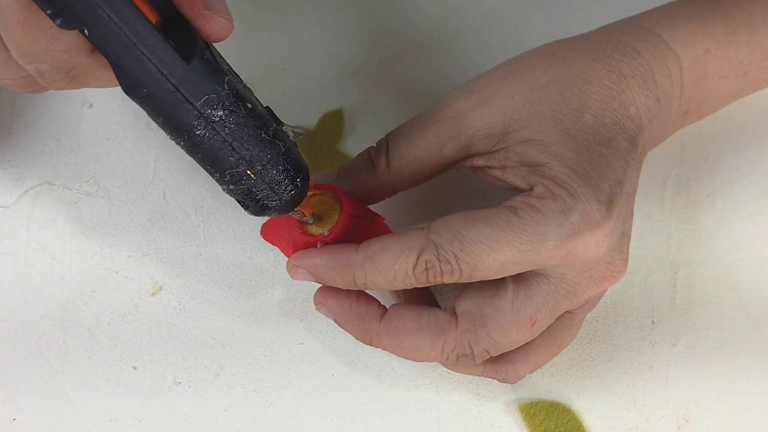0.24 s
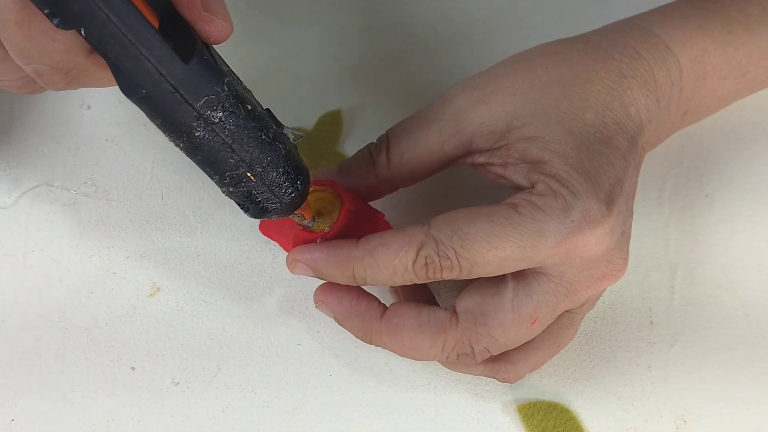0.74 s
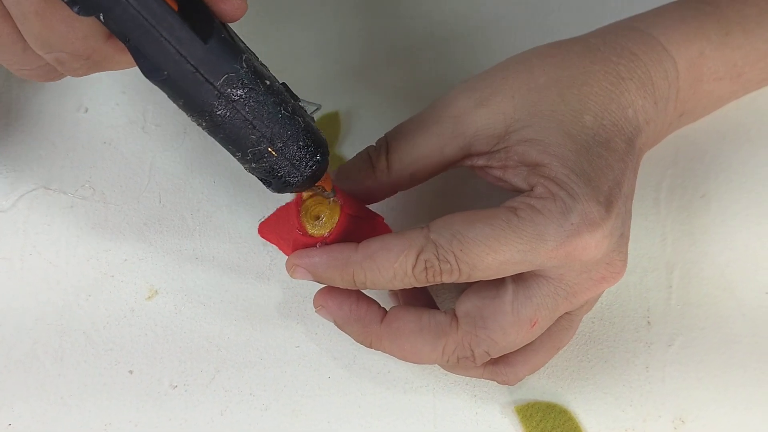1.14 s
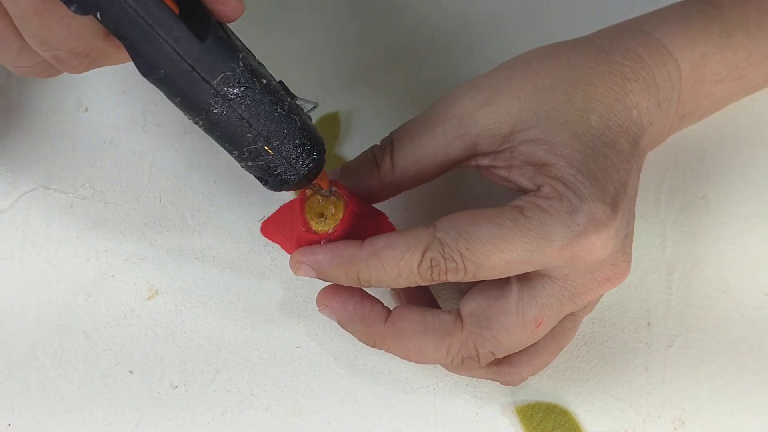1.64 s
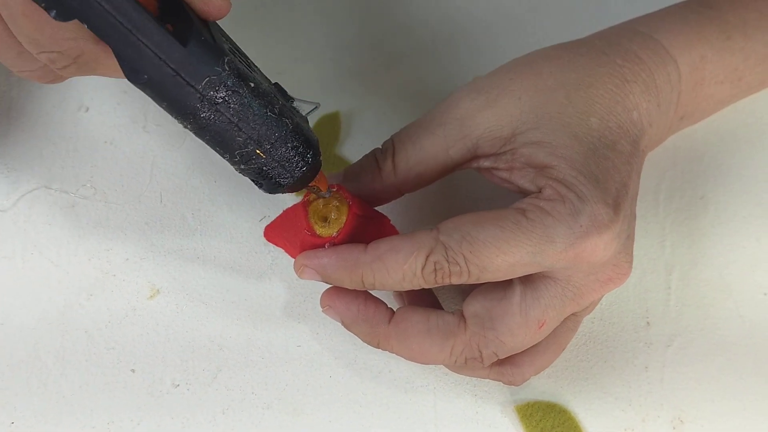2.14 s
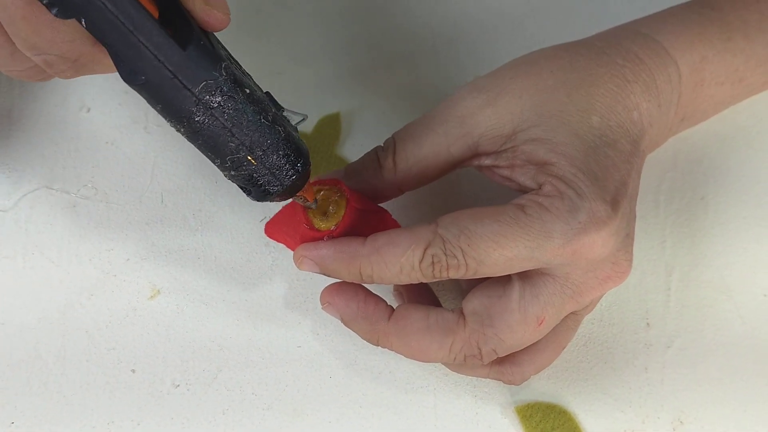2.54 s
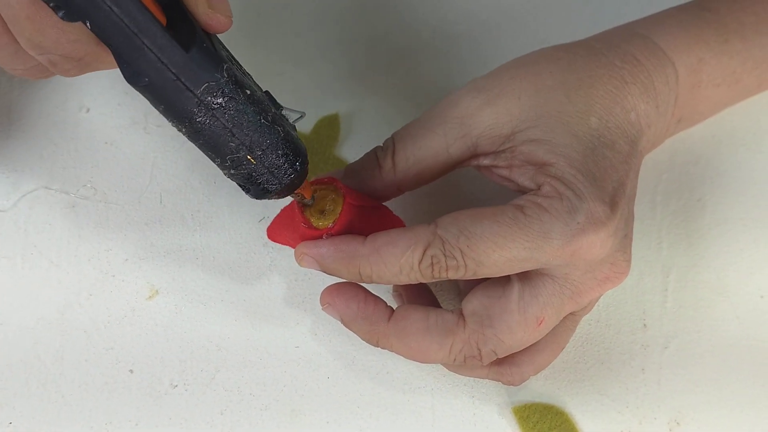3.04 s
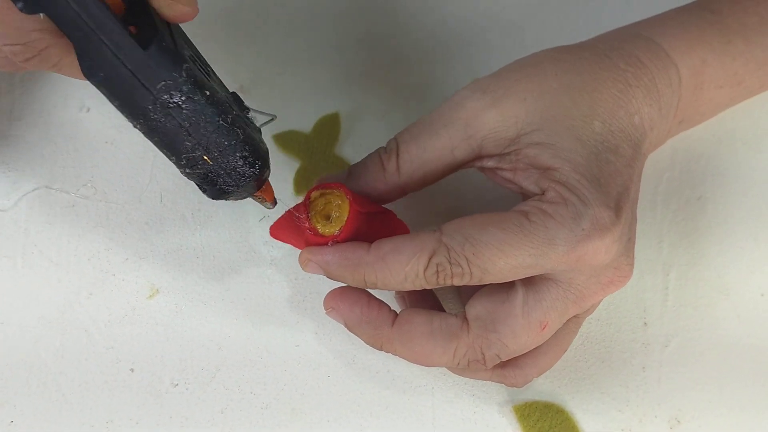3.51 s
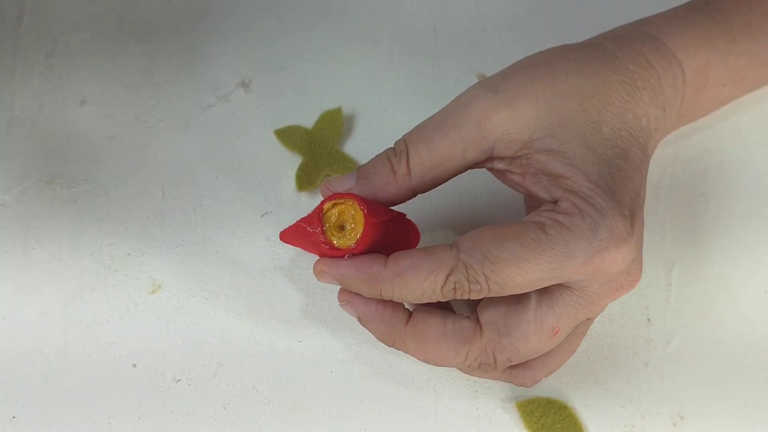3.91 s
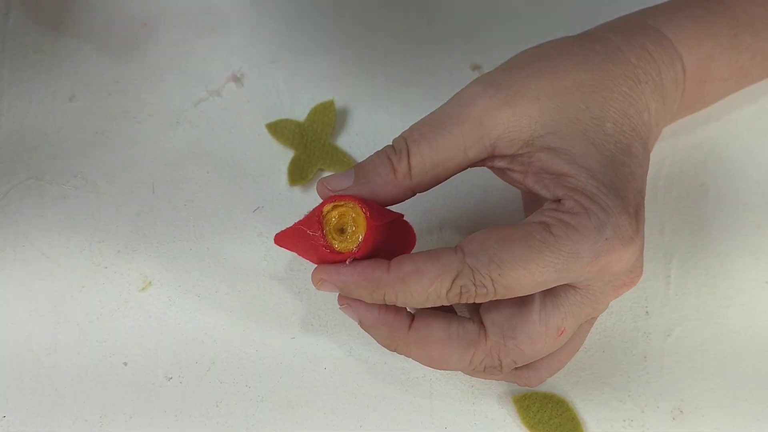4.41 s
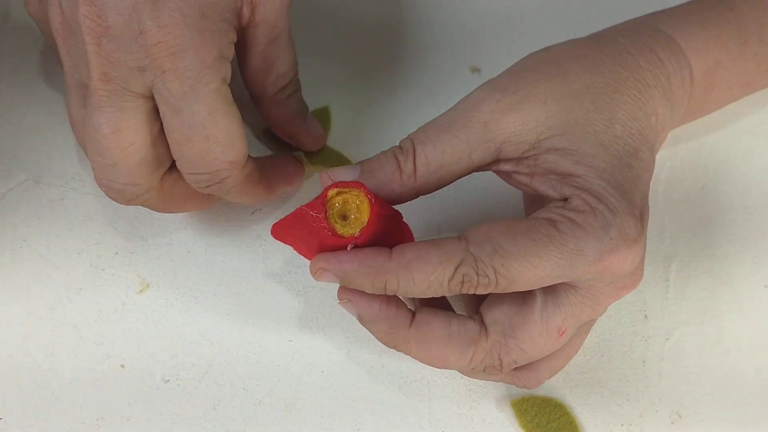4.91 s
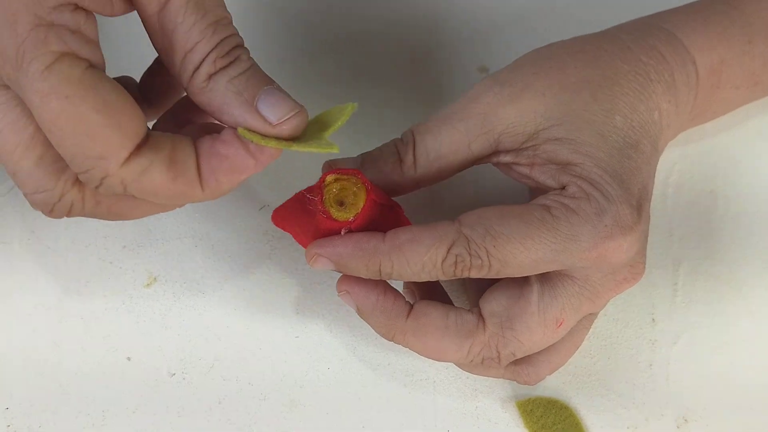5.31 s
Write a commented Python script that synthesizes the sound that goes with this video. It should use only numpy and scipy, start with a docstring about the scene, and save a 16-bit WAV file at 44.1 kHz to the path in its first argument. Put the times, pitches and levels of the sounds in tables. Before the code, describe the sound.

A fan hums softly throughout in a small room, with a faint, thin, pulsing whine high above it. The sound is close and in wide stereo. After a tiny tick near 0.8 seconds, a hot-glue gun's trigger gives a dry snap at about 1.3 seconds. Small ticks from the glue feed follow until around 2.5 seconds, with a short rustle of felt near 2 seconds. A very faint, high squeak of glue wavers from 2.5 to 3 seconds. From about 3.7 seconds come light handling ticks and rubbing. The gun is set down on a table with two bumps at about 4.1 and 4.2 seconds and a short scrape. At 4.6 seconds it drops with a loud, sharp knock that briefly rings the table top and rattles its plastic shell. Then only faint felt rustling and the fan remain, until about 5.5 seconds.

```python
"""A hot-glue gun drops onto a table with a loud knock that rings the table top, close by in a small room.
Before that, its trigger snaps, its feed ticks, and glue squeaks faintly onto rustling felt; then the
gun is set down with two bumps and a scrape, and its plastic shell rattles.
A fan hums behind it all; the camera adds a thin pulsing whine and widens the stereo sound."""
import sys
import numpy as np
from scipy import signal
from scipy.fft import rfft, irfft, next_fast_len
from scipy.io import wavfile
from scipy.ndimage import uniform_filter1d

SR = 44100
rng = np.random.default_rng(int(sys.argv[2]) if len(sys.argv) > 2 else 0)


def waveform_to_disk(signal):
    """Save audio, clipped to [-1, 1], as 16-bit WAV at the path in sys.argv[1]."""
    frames = np.transpose(np.atleast_2d(signal))
    scaled = np.clip(frames, -1, 1) * 32767
    samples = np.round(scaled).astype(np.int16)
    wavfile.write(sys.argv[1], SR, samples)


N = 244755
TIME = np.arange(N) / SR
TOP_HZ = 15900  # treble limit

# blows on the table, from the trigger's jolt to the drop: t/s, push/dB, contact time/ms, shell rattle/dB
KNOCKS = [(1.3498, -28, 0.39, -70), (4.0618, -8, 0.39, -30.5), (4.1882, -35, 0.27, -29.5),
          (4.1941, -0.5, 0.9, -57), (4.2187, -12, 1, -58), (4.5186, -14, 0.52, -63),
          (4.561, 0.3, 0.23, -24.5)]


def amp(db):
    """Turn decibels into a factor to multiply by."""
    return 10 ** (np.asarray(db) / 20)


def unit(x):
    """Scale a signal to an average strength (rms) of 1."""
    return x / np.sqrt(np.mean(x ** 2))


def curve(rows):
    """Join (t/s, value) points with straight lines."""
    return np.interp(TIME, *np.transpose(rows))


def over_pitch(points, f):
    """Read between (f/Hz, value) points, with octaves evenly spaced."""
    hz, value = np.transpose(points)
    return np.interp(np.log(f + 1), np.log(hz), value)


def noise(spectrum, size=N):
    """Stereo noise of strength 1, shaped by (f/Hz, level/dB) points."""
    # how alike the two microphones hear it: f/Hz, correlation (1 = the same)
    likeness = [(60, 0.13), (110, 0), (220, 0.73), (400, 0.52), (750, 0.37), (1400, 0), (15000, 0)]
    count = next_fast_len(size)
    f = np.fft.rfftfreq(count, 1 / SR)
    alike = np.clip(over_pitch(likeness, f), -1, 1)
    mid, side = rfft(rng.standard_normal((2, count))) * np.sqrt([1 + alike, 1 - alike])
    gain = amp(over_pitch(spectrum, f)) * (f < TOP_HZ)
    left_right = np.array([mid + side, mid - side])
    return unit(irfft(left_right * gain, count)[:, :size])


def wobble(per_s):
    """A random wobble of strength 1 that glides to per_s new values a second."""
    size = max(int(SR / per_s), 1)
    steps = np.repeat(rng.standard_normal(N // size + 1), size)
    return unit(uniform_filter1d(steps, size)[:N])


def band(hz, width):
    """A narrow band of noise, heard as a breathy whistle."""
    phase = 2 * np.pi * hz * TIME
    return unit(wobble(width) * np.cos(phase) + wobble(width) * np.sin(phase))


def burst(spectrum, t60, size=8192):
    """A crack of noise; t60 is the time in seconds it takes to fade by 60 dB."""
    fade = amp(-60 * TIME[:size] / t60)
    return unit(noise(spectrum, size) * fade) * np.sqrt(np.mean(fade ** 2))


def strokes(rows):
    """Loudness of strokes that swell by 20 dB in their rise time and fade by 20 dB in their fall time."""
    power = 0
    for s, db, rise, fall in rows:
        away = np.maximum((s - TIME) / rise, (TIME - s) / fall)
        power += amp(db - 20 * np.minimum(away, 10)) ** 2
    return np.sqrt(power)


def add(track, s, sound):
    """Mix a short sound into a track at s seconds."""
    start = int(s * SR)
    track[:, start:start + sound.shape[-1]] += sound[:, :N - start]


def room(x, wet_db, t60, treble_t60):
    """Add the room's short echo at level wet_db; its treble dies first."""
    t = TIME[:SR // 2]
    echoes = rng.standard_normal((2, len(t))) * (1 - np.exp(-t / 0.0027))
    low = signal.sosfilt(signal.butter(1, 3000, fs=SR, output="sos"), echoes)
    tail = low * amp(-60 * t / t60) + (echoes - low) * amp(-60 * t / treble_t60)
    tail /= np.sqrt(np.sum(tail ** 2) / 2)
    return x + amp(wet_db) * signal.fftconvolve(x, tail, axes=1)[:, :N]


def fan(air_db=-54, waver_db=2, drift=.0015):
    """A fan moves air, with a few wavering motor tones and narrow whistles."""
    # rush of the air: f/Hz, level/dB
    air_spectrum = [(30, -1), (60, -3.5), (110, 0.5), (230, 2), (450, -5), (850, -8.5), (1200, -12.5),
                    (1800, -15.5), (3000, -17.5), (5500, -20.5), (8000, -24.5), (10000, -29.5),
                    (13000, -22.5), (15500, -28.5)]
    # motor tones: f/Hz, level/dB
    motor_tones = [(247.6, -61), (296.1, -90), (349.9, -65.5), (527.6, -77.5), (694.4, -77), (742.9, -70),
                   (866.7, -65.5), (1238, -80.5)]
    # whistles in the hiss: f/Hz, width/Hz, level/dB
    bands = [(1760, 170, -77.5), (4200, 190, -78), (5530, 200, -82), (6990, 240, -74.5)]
    air = noise(air_spectrum) * amp(air_db + 0.52 * wobble(6.23))
    hum = 0
    for hz, db in motor_tones:
        peak = amp(db + waver_db * wobble(5)) * np.sqrt(2)
        phase = 2 * np.pi * hz * np.cumsum(1 + drift * wobble(8)) / SR
        hum += peak * np.sin(phase)
    whistles = sum(amp(db) * np.array([band(hz, width), band(hz, width)]) for hz, width, db in bands)
    return air + hum + whistles


def camera_whine(whine_db=-74, pulse_db=7, pictures_per_s=30):
    """The camera's electronics give a high hiss that blips with every picture."""
    blip = (.5 + .5 * np.cos(2 * np.pi * pictures_per_s * (TIME - 2.311))) ** 6
    hiss = noise([(12500, -34), (13800, -9), (14650, -1), (15600, -4), (16000, -30)])[0]
    return amp(whine_db) * unit(hiss * amp(pulse_db * blip))


def glue_squeak(waver=.009, flutter_db=3):
    """Hot glue whistles thinly as it is squeezed out of the nozzle."""
    # pitch of the squeak: t/s, f/Hz
    pitch = [(2.46, 13100), (2.57, 13750), (2.605, 12400), (2.67, 13650), (2.72, 12950), (2.78, 13300),
             (2.83, 12250), (2.92, 11900)]
    # the squeeze that drives it: peak t/s, level/dB, rise/s, fall/s
    squeeze = (2.57, -72, .11, .7)
    hz = curve(pitch) * (1 + waver * wobble(300))
    tone = np.sin(2 * np.pi * np.cumsum(hz) / SR)
    return tone * strokes([squeeze]) * amp(flutter_db * wobble(40))


def felt_rustle(grain_db=3, patchy_db=2):
    """Fibres catch and let go, so the rubbing comes in grains and patches."""
    # hiss of rubbed felt: f/Hz, level/dB
    felt_spectrum = [(300, -10), (1000, 0), (1800, 0), (3000, -2), (5500, 0), (8000, -9), (11000, -7),
                     (15000, -9)]
    # fingers and felt stroking the gun: peak t/s, level/dB, rise/s, fall/s
    rubs = [(1.69, -66, .1, .25), (1.948, -49.5, .06, .08), (4.005, -55, .33, .1), (4.115, -53.5, .08, .22),
            (4.26, -53.5, .12, .11), (4.53, -54, .1, .1), (5.0, -70, .6, 1.2)]
    grip = unit(amp(grain_db * wobble(900) + patchy_db * wobble(50)))
    return noise(felt_spectrum) * grip * strokes(rubs)


def handling_ticks(per_s=10, spread_db=2.5, centre_hz=3500, beside_db=-11):
    """List the faint ticks of handling the gun, each with a random time, level and pitch."""
    # spells of handling: start/s, end/s, level/dB
    spells = [(2.38, 2.52, -54.5), (3.68, 4.35, -52)]
    rows = []
    for (start, end, db), chance in zip(spells, rng.uniform(-1, 1, (len(spells), 32, 3))):
        for slot, (shift, size, octaves) in zip(np.arange(start, end, 1 / per_s), chance):
            s = slot + (1 + shift) / 2 / per_s
            rows.append((s, db + spread_db * size, centre_hz * 2 ** octaves, beside_db))
    return rows


def ticks(edge_db=-8):
    """The glue feed and fingers make tiny cracks, each coloured around one pitch."""
    # clear ticks: t/s, level/dB, centre f/Hz, level an octave to either side/dB
    clear_ticks = [(.8164, -53, 2000, -16), (1.2396, -48, 13500, -17), (1.2535, -46, 13000, -16),
                   (1.6338, -44, 2180, -13), (1.683, -47, 13500, -19), (1.6942, -41, 3120, -22),
                   (1.739, -47.5, 2190, -17), (1.7738, -39.5, 5500, -12), (1.931, -45, 2300, -15),
                   (1.9752, -42.5, 2190, -16), (1.9951, -37.5, 3100, -24), (2.001, -43, 1200, -18),
                   (2.0688, -44.5, 6000, -3), (2.2268, -40, 1600, -21), (2.5493, -50, 3300, -2),
                   (3.8016, -46.5, 8000, 2), (3.8849, -39.5, 1500, -9), (3.923, -42, 4500, -6),
                   (4.0608, -43, 12000, -9)]
    out = np.zeros((2, N))
    for s, db, hz, beside_db in clear_ticks + handling_ticks():
        far_db = beside_db + edge_db
        spectrum = [(200, far_db), (hz / 2, beside_db), (hz, 0), (hz * 2, beside_db), (SR, far_db)]
        add(out, s, amp(db) * burst(spectrum, t60=.014))
    return room(out, wet_db=-11.5, t60=0.13, treble_t60=0.089)


def trigger_snap(right_db=1.2):
    """The trigger slips on the glue stick with a dry snap."""
    # the snap and its rebound: t/s, level/dB
    snaps = [(1.3498, -19), (1.3517, -33)]
    # tone colour of a snap: f/Hz, level/dB
    snap_spectrum = [(40, -34), (200, 9), (450, -2), (950, 3), (1600, -6), (2500, 1.5), (3700, -1.5),
                     (5500, -7), (7000, -16), (10000, -10), (14500, 3.5), (16000, 0)]
    out = np.zeros((2, N))
    for s, db in snaps:
        add(out, s, amp(db) * burst(snap_spectrum, t60=0.0075))
    return room(out * amp([[-right_db], [right_db]]), wet_db=-15.5, t60=0.22, treble_t60=0.16)


def shell_rattle():
    """The gun's plastic shell and wire stand rattle at each knock."""
    # tone colour of the shell: f/Hz, level/dB
    shell_spectrum = [(40, -35), (150, -14), (500, -2.5), (1050, 7), (1500, -2), (2000, -3), (3100, -6.5),
                      (5500, -15), (9000, -25), (14000, -25), (16000, -30)]
    out = np.zeros((2, N))
    for s, _, _, db in KNOCKS:
        add(out, s, amp(db) * burst(shell_spectrum, t60=0.034))
    return room(out, wet_db=-3.5, t60=0.26, treble_t60=0.19)


def ring_table(force, clunk_db=-28, clunk_t60=0.27, thump_db=-8, thump_ms=0.38):
    """A push makes the table top ring at its own tones; many weaker ones blur into a clunk."""
    # main tones of the table top: f/Hz, level/dB, time to fade by 60 dB/s
    tones = [(91.5, -43, .2), (129.5, -19.5, 0.29), (169, -19, 0.23), (203.7, -12.5, 0.19),
             (247.3, -19.5, .21), (307, -25, 0.18), (379, -30, 0.19), (470, -33.5, 0.11), (501, -30, .19),
             (585, -26.5, 0.17), (646.3, -14.5, 0.13), (713, -20.5, 0.14), (900, -44, 0.1),
             (950, -30, 0.06), (1080, -34, 0.13), (1170, -23, 0.12)]
    t = TIME[:SR // 2]
    ring = sum(amp(db - 60 * t / t60) * np.cos(2 * np.pi * hz * t) for hz, db, t60 in tones)
    clunk_spectrum = [(60, -28), (250, -7), (450, 8), (800, 5), (1200, -9), (1600, -16), (3000, -30)]
    clunk = noise(clunk_spectrum, len(t)) * amp(clunk_db - 60 * t / clunk_t60)
    ringing = signal.fftconvolve(force[None], ring + clunk, axes=1)[:, :N]
    # the first thump comes as the surface gives way and springs back
    offset = np.arange(-200, 201) / SR * 1000 / thump_ms
    thump = amp(thump_db) * (1 - offset ** 2) * np.exp(-offset ** 2 / 2)
    return ringing + signal.fftconvolve(force, thump, "same")


def gun_on_table(left_db=0.9, rough_db=4, bass_cut_hz=85):
    """Each knock is a brief push, duller the longer it lasts; dragging shakes the same table tones."""
    # the gun drags as it touches down and before each heavy knock: peak t/s, level/dB, rise/s, fall/s
    drags = [(3.89, -52, .03, .3), (4.175, -36, .13, .2), (4.55, -41.5, .12, .07)]
    force = np.zeros(N)
    for s, db, contact_ms, _ in KNOCKS:
        push = np.exp(-.5 * ((TIME - s) * 1000 / contact_ms) ** 2)
        force += amp(db) * push / push.sum()
    drag_spectrum = [(30, -12), (80, 4), (250, 9.5), (450, 2), (700, -2.5), (1050, 2),
                     (2000, -6), (8000, -4)]
    friction = noise(drag_spectrum)[0] * amp(rough_db * wobble(90))
    top = ring_table(force) + unit(ring_table(friction)) * strokes(drags)
    # air slips round the edge of the table top, so the deep bass is lost
    top = signal.sosfilt(signal.butter(2, bass_cut_hz, "high", fs=SR, output="sos"), top)
    return room(top * amp([[left_db], [-left_db]]), wet_db=-21.5, t60=0.38, treble_t60=0.22)


def scene():
    """Work with the glue gun in front of a background that gently swells and sinks."""
    # loudness of fan and whine together: t/s, level/dB
    swell = [(0, -2), (.6, -6), (1.45, -4.5), (2.0, .7), (3.25, -.3), (3.75, -2.3), (4.7, 1.5), (5.55, .3)]
    background = (fan() + camera_whine()) * amp(curve(swell))
    gun = gun_on_table() + shell_rattle() + trigger_snap() + ticks()
    return background + gun + felt_rustle() + glue_squeak()


def record(dry, crossfeed=0.67, delay_samples=20):
    """The camera widens the stereo by taking a late copy of each side from the other, then filters it."""
    other_side = np.pad(dry[::-1], ((0, 0), (delay_samples, 0)))[:, :N]
    wide = dry - crossfeed * other_side
    # cut the deepest bass, then the highest treble
    wide = signal.sosfilt(signal.butter(3, 48, "high", fs=SR, output="sos"), wide)
    return signal.sosfilt(signal.ellip(10, .2, 70, TOP_HZ, fs=SR, output="sos"), wide)


dry = scene()
out = record(dry)
waveform_to_disk(out)
```